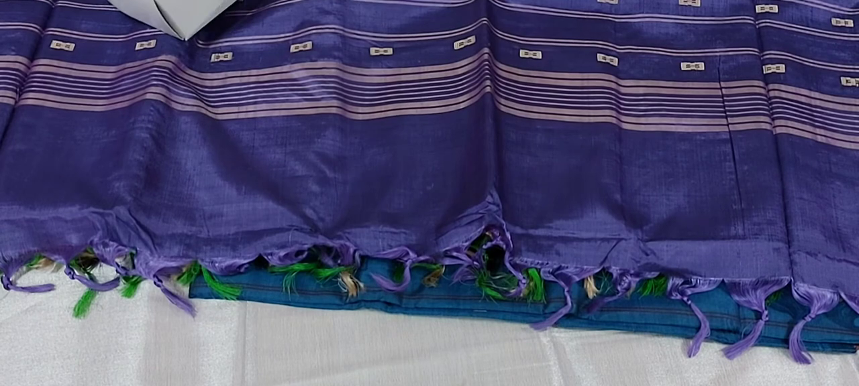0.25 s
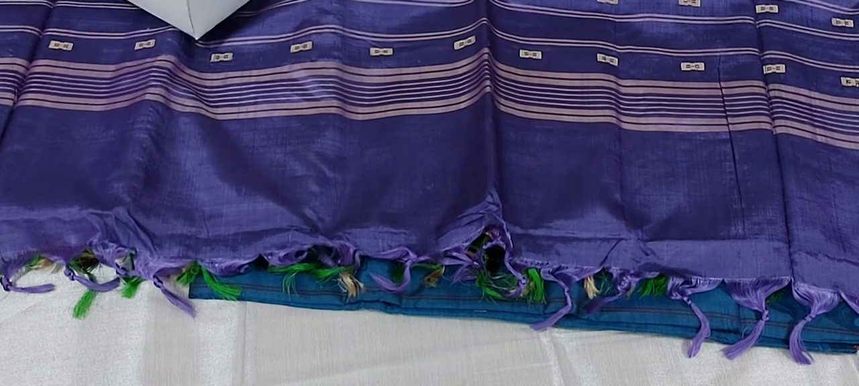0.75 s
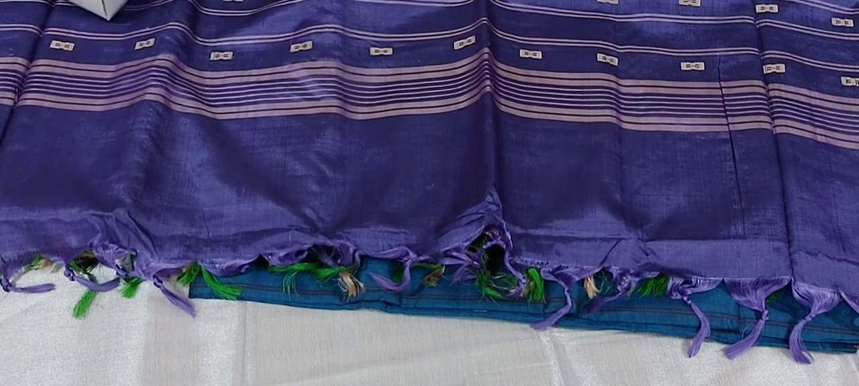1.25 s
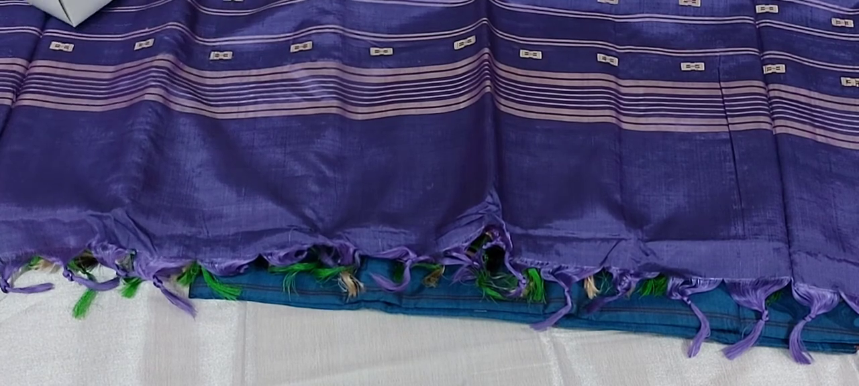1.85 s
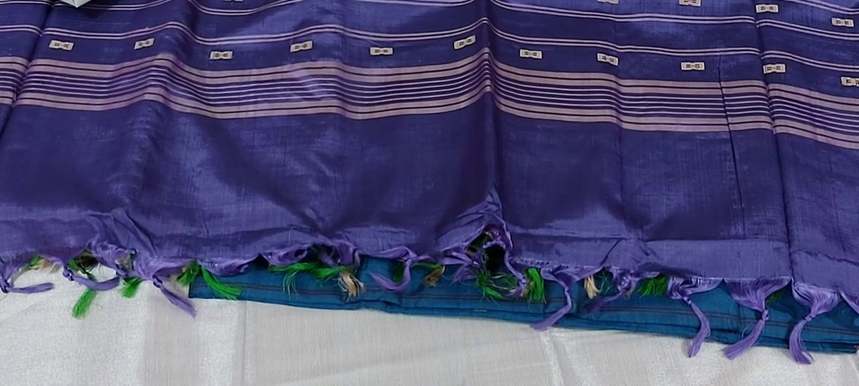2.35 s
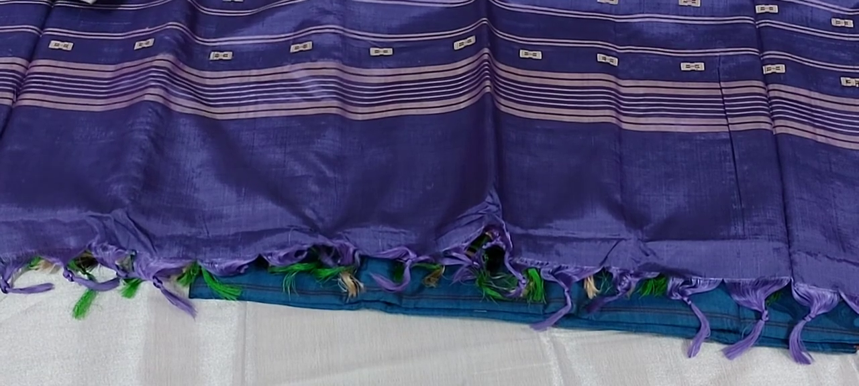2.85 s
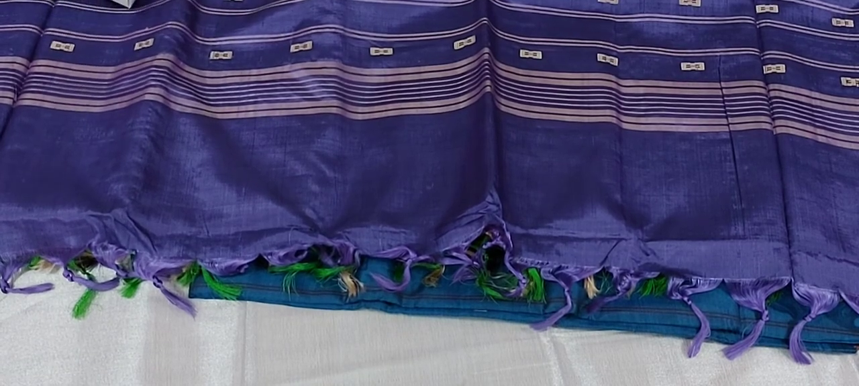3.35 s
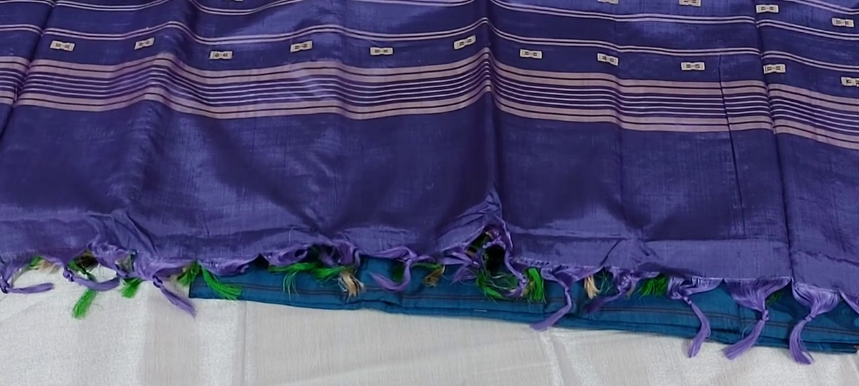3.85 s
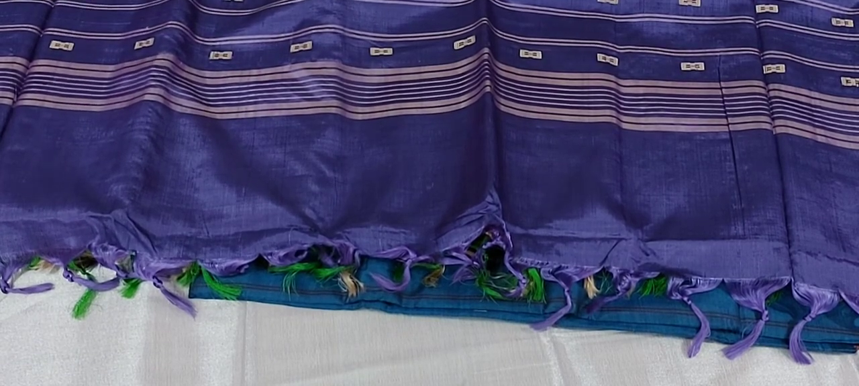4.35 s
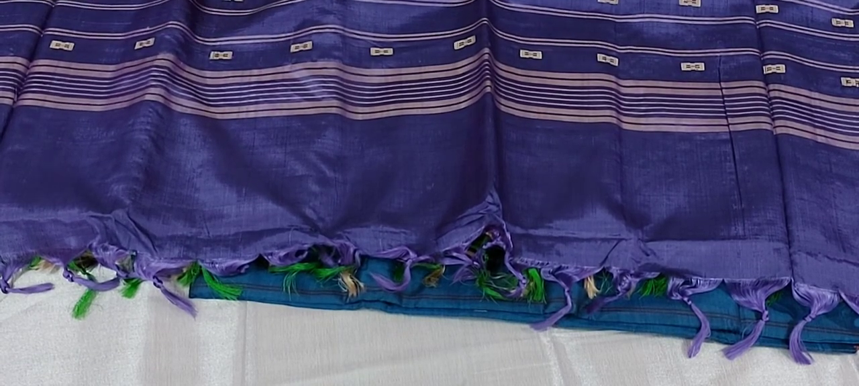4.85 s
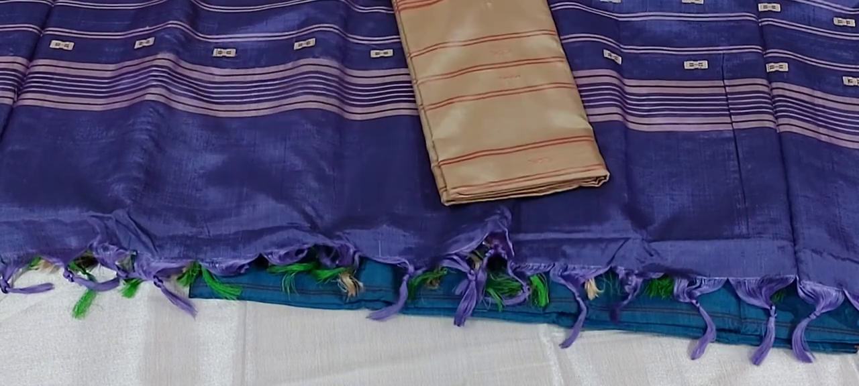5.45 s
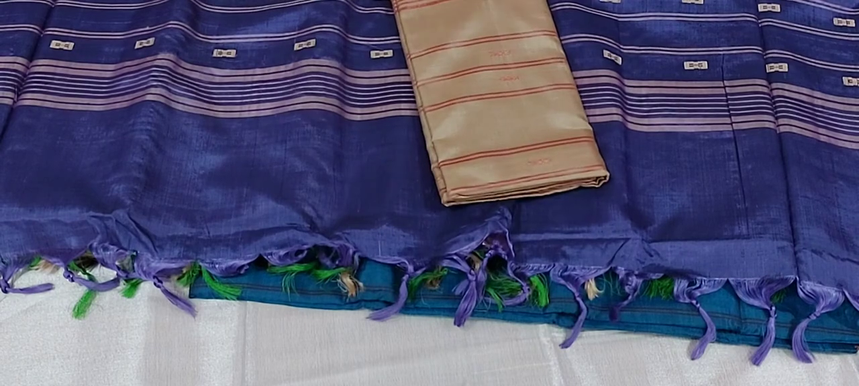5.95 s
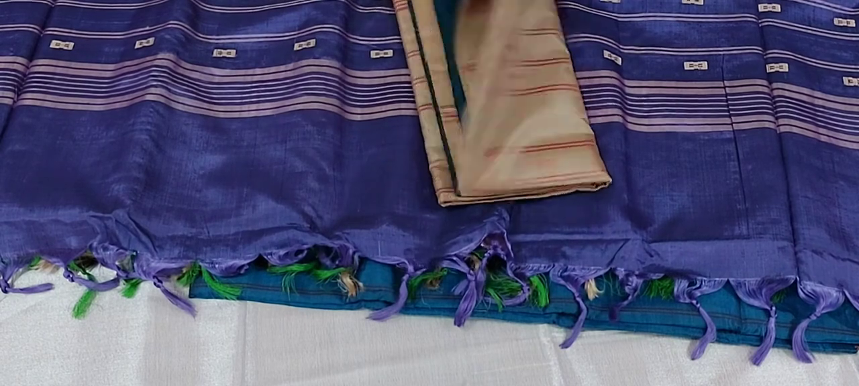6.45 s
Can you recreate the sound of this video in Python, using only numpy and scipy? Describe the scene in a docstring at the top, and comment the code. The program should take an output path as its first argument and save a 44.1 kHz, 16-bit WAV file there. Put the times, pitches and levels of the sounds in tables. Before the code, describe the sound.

Folded silk cloths slide, rustle and flop softly onto a covered table, with dull pats and light flicks in a small humming room.

```python
"""Silk cloths handled on a covered table

Folded silk cloths are slid off a pile, patted and flopped down, close to two microphones in a small room.
Each landing is a burst of soft contacts, shaped by the resonance of a pocket of trapped air.
Strokes, and the rustle and click of landing cloth, are dense snaps heard as hiss and sparser, duller fold snaps.
Brief low swings make air puffs and one short low knock; the room rings, hums and faintly whines."""
import sys
import numpy as np
from scipy import signal
from scipy.fft import rfft, irfft, next_fast_len
from scipy.io import wavfile
from scipy.ndimage import map_coordinates

SR = 44100
rng = np.random.default_rng(int(sys.argv[2]) if len(sys.argv) > 2 else 0)


def transcribe(signal):
    """Save signal, clipped to [-1, 1], as a 16-bit WAV file at the path in sys.argv[1]."""
    frames = np.atleast_2d(signal).T
    limited = np.clip(frames, -1, 1)
    pcm = np.round(limited * 32767).astype(np.int16)
    wavfile.write(sys.argv[1], SR, pcm)


N = 294780


def amp(db):
    """Logarithmic level: decibels to an amplitude gain."""
    return 10 ** (np.asarray(db) / 20)


def unit(x):
    """Normalisation by mean power: x scaled to rms 1."""
    return x / np.sqrt(np.mean(x ** 2) + 1e-20)


def along(points, hz):
    """Logarithmic pitch scale: (pitch_hz, value) points joined by straight lines over log frequency."""
    pitches, values = np.transpose(points)
    return np.interp(np.log(hz + 1), np.log(pitches), values)


def wobble(rate):
    """Slow random modulation: a smooth curve through random knots, rate of them a second."""
    knots = rng.standard_normal(int(N * rate / SR) + 4)
    return map_coordinates(knots, [np.arange(N) * rate / SR])


def filtered(x, response):
    """Linear filtering: the spectrum of x times a response of frequency."""
    size = x.shape[-1]
    padded = next_fast_len(size + 4096, real=True)
    hz = np.fft.rfftfreq(padded, 1 / SR)
    return irfft(rfft(x, padded) * response(hz), padded)[..., :size]


def causal(gain):
    """Minimum phase: the folded cepstrum gives this gain with no sound ahead of the blow."""
    cepstrum = irfft(np.log(np.maximum(gain, 1e-6)))
    half = len(cepstrum) // 2
    cepstrum[1:half] *= 2
    cepstrum[half + 1:] = 0
    return np.exp(rfft(cepstrum))


def bump(hz, centre_hz, width_hz):
    """Damped resonance: a Lorentzian of height 1 and full width width_hz at half height."""
    return 1 / (1 + (2 * (hz - centre_hz) / width_hz) ** 2)


def diffuse(size):
    """Diffuse field: noise lifted at the room's modes, its left-right coherence greatest in the bass."""
    # low modes of the room: pitch_hz, width_hz, lift_db
    modes = [(65.5, 8.7, 5), (109.3, 3.8, 9.5), (127.8, 8.5, 7), (262.5, 13.2, 9.5), (313.2, 20, 7),
             (385.3, 9.7, 8), (481, 4.5, 6.5), (592, 6.2, 6), (680, 25, 4), (868, 20, 3), (1062, 31, 3.5)]
    # left-right likeness of the field: pitch_hz, correlation
    likeness = [(40, 0.19), (130, 0.96), (280, 0.82), (500, 0.62), (1000, 0.043), (2000, 0.016),
                (15000, 0.014)]

    def mid_side(hz):
        lift = amp(sum(db * bump(hz, pitch, width) for pitch, width, db in modes))
        turn = np.arccos(np.clip(along(likeness, hz), -1, 1)) / 2
        return lift * np.array([np.cos(turn), np.sin(turn)])

    mid, side = filtered(rng.standard_normal((2, size)), mid_side)
    return np.array([mid + side, mid - side])


def coloured(x, spectrum):
    """Spectral shaping: x filtered by a (pitch_hz, gain_db) curve, at rms 1."""
    return unit(filtered(x, lambda hz: amp(along(spectrum, hz))))


def room(force, s, direct_db, count=6):
    """Room acoustics: contacts from time s on reach two microphones directly, by early echoes and as a tail."""
    # reverberation time: pitch_hz, t60_s
    reverberation = [(90, 0.34), (450, 0.31), (2200, 0.35), (12000, 0.28)]
    # the cloth moves from the left to the middle: time_s, lead_ms of the left microphone
    left_lead = [(0, 0.19), (4.3, 0.16), (5.2, 0.047), (6.6, 0.057)]
    size = len(force)
    index = np.arange(size)

    def late(ms):
        return np.interp(index - np.round(ms * SR / 1000), index, force, left=0)

    lead_ms = np.interp(s + index / SR, *np.transpose(left_lead))
    out = amp(direct_db) * np.array([force, late(lead_ms)])
    # early reflections off near walls
    for ms, strength in zip(rng.uniform(2, 24, count), rng.standard_normal(count)):
        out += 0.18 * strength * late(ms)
    noise = unit(diffuse(size))
    pitches, t60s = np.transpose(reverberation)
    # the tail holds for 18 ms, while the first echoes arrive, then decays
    fading = np.maximum(np.arange(SR // 2) / SR - .018, 0)
    for share, t60 in zip(np.eye(len(t60s)), t60s):
        decay = amp(-60 * fading / t60) ** 2
        # every contact feeds its energy to the tail
        energy = abs(signal.fftconvolve(force ** 2, decay / decay.sum())[:size])
        band_noise = filtered(noise, lambda hz: along(np.c_[pitches, share], hz))
        out += np.sqrt(energy) * band_noise
    return out


def grains(rate, size_db, size):
    """Shot noise: snaps of cloth at random moments, rate a second, their sizes spread by size_db."""
    chance = rng.random(size)
    sign, strength = np.sign(rng.standard_normal(size)), rng.standard_normal(size)
    return (chance < rate / SR) * sign * amp(size_db * np.clip(strength, -2, 2))


def add(track, s, sound):
    """Superposition: a sound mixed in from time s."""
    start = max(round(s * SR), 0)
    track[:, start:start + sound.shape[1]] += sound[:, :max(N - start, 0)]


def background():
    """Stationary noise: the room's low hum, one swell of narrow-band whine and the microphones' own hiss."""
    # spectrum of the hum: pitch_hz, gain_db
    hum_spectrum = [(20, -13), (65, -1), (130, -9.5), (180, -8.5), (280, -3), (380, -7), (550, -14),
                    (1000, -19), (1500, -28), (3000, -78), (16000, -25.5)]
    # spectrum of the hiss: pitch_hz, gain_db
    hiss_spectrum = [(100, 0), (2000, -15), (5500, -5), (6700, 8.5), (7700, 18), (8600, 2), (11500, 3.5),
                     (16000, -14)]
    whine_s, whine_db, whine_length_s = 2.53, -78, 0.35  # peak time, level before balance, Gaussian deviation
    hum = amp(-66.0 + 0.8 * wobble(1.76)) * coloured(diffuse(N), hum_spectrum)
    swell = np.exp(-.5 * ((np.arange(N) / SR - whine_s) / whine_length_s) ** 2)
    whine = amp(whine_db) * swell * unit(filtered(diffuse(N), lambda hz: bump(hz, 1390, 75)))
    hiss = amp(-74.0) * coloured(rng.standard_normal((2, N)), hiss_spectrum)
    balance = amp([[1], [-1]])
    return (hum + whine) * balance + hiss


def puffs_and_knock():
    """Low-frequency pressure pulses: each is a sine under a Gaussian, stronger on the left."""
    # low air puffs and one short low knock, at 4.035 s:
    # centre_s, level_db before the side gains, length_s to a fall by e, pitch_hz
    low_swings = [(0.013, -44, 0.032, 46.6), (0.484, -53, 0.039, 75), (0.957, -47.5, 0.025, 67.4),
                  (1.298, -52, .021, 50.4), (1.462, -42, 0.012, 55), (2.482, -48, 0.012, 50.7),
                  (3.866, -51, .009, 75), (3.921, -48.5, .013, 70), (4.035, -39, 0.0047, 82),
                  (4.057, -49, .016, 50), (5.234, -42, .02, 60), (6.19, -48, .031, 80.5),
                  (6.308, -54, 0.11, 71)]
    out = np.zeros((2, N))
    t = np.arange(N) / SR
    for (s, db, length, hz), (phase, skew) in zip(low_swings, rng.random((len(low_swings), 2))):
        near = abs(t - s) < 3 * length
        u = t[near] - s
        turns = hz * u + phase + np.array([[0], [0.5 * skew]])  # the sides differ by up to a quarter cycle * 2
        out[:, near] += amp(db) * np.exp(-(u / length) ** 2) * np.sin(2 * np.pi * turns)
    side_gains = amp([[2], [-6]])
    return out * side_gains


def cloth_gains():
    """Power addition: gains of silk, folds and sheen, as each movement swells, peaks and dies away."""
    # strokes of cloth over cloth, and the rustle and click of landing cloth:
    # peak_s, swell_s, fade_s, then silk_db, folds_db, sheen_db before flutter and balance
    movements = [(.03, 0.14, 0.036, -66, -66, -63), (.13, 0.022, .17, -73, -75, -74),
                 (.345, 0.074, 0.077, -55.5, -57, -74), (0.403, 0.072, 0.096, -57, -48, -80),
                 (.835, 0.061, 0.12, -63, -67, -65), (.9, 0.051, 0.095, -67, -56.5, -74),
                 (1.05, 0.064, 0.064, -68, -59.5, -72), (1.479, 0.067, .07, -54, -48.5, -78),
                 (1.555, 0.04, 0.094, -49.5, -67, -62), (1.75, 0.23, 0.094, -59, -56.5, -62.5),
                 (2.11, 0.18, 0.11, -72.5, -64.5, -87), (2.38, 0.1, 0.14, -72, -67, -70),
                 (2.75, 0.057, 0.077, -90, -72, -69), (3.15, 0.24, 0.22, -57.5, -65.5, -64),
                 (3.365, 0.12, 0.075, -52.5, -59, -61), (3.53, 0.07, 0.09, -73, -67, -80),
                 (3.79, 0.063, 0.067, -62, -59, -79), (4.035, .1, 0.11, -51, -62.5, -56.5),
                 (4.16, .03, 0.077, -61, -80, -62), (4.779, 0.11, 0.17, -72, -55, -76),
                 (5.14, 0.025, 0.062, -89, -71.5, -63.5), (5.215, .015, 0.055, -72, -44, -55.5),
                 (5.7, 0.17, 0.2, -69.5, -59.5, -70), (5.834, 0.06, 0.09, -59.5, -54, -76),
                 (6.06, 0.15, 0.16, -60, -54, -85), (6.18, 0.095, 0.052, -55.5, -47, -80),
                 (6.295, 0.032, 0.063, -65.5, -51.5, -82), (6.46, .12, 0.069, -79, -62, -77),
                 (6.58, 0.14, 0.097, -76, -92, -64.5)]
    # held cloth between movements: silk_db, folds_db, sheen_db on the same scale
    resting_db = [-86, -74.5, -77]
    drop_db, rounding = 11.5, 0.3  # fall per swell or fade time, far from the peak; rounding of the peak
    t = np.arange(N) / SR
    power = np.outer(amp(resting_db), np.ones(N)) ** 2
    for s, swell, fade, *levels_db in movements:
        away = (t - s) / np.where(t < s, swell, fade)
        shape = amp(-drop_db * (np.hypot(away, rounding) - rounding))
        power += np.outer(amp(levels_db), shape) ** 2
    return np.sqrt(power)


def rubbing_and_rustling():
    """Friction and buckling: threads make fine hiss and airy sheen, folds buckle in coarser, duller snaps."""
    # hiss of silk: pitch_hz, gain_db
    silk_spectrum = [(100, 3), (500, -13.5), (1200, 0), (2500, 2), (4200, 1), (6000, -3), (9000, -3.5),
                     (11800, -2.5), (16000, -8.5)]
    # crumpling folds: pitch_hz, gain_db
    folds_spectrum = [(25, -7), (70, -11), (130, 2), (190, 3), (300, 4), (550, 3.5), (1000, -1), (2000, -7),
                      (4000, -21.5), (15000, -43)]
    # airy top of the silk: pitch_hz, gain_db
    sheen_spectrum = [(3000, -12.5), (7000, 0.5), (9000, 1.5), (11500, 6.5), (14000, 5.5), (16000, 0)]
    silk_gain, folds_gain, sheen_gain = cloth_gains()
    threads = room(grains(rate=3000, size_db=5, size=N), 0, direct_db=-5)
    silk = silk_gain * amp(1.0 + 1.23 * wobble(30)) * coloured(threads, silk_spectrum)
    snaps = room(grains(rate=260, size_db=9.5, size=N), 0, direct_db=-9.5)
    folds = folds_gain * amp(0.17 * wobble(25)) * coloured(snaps, folds_spectrum)
    finest = room(grains(rate=11000, size_db=3.0, size=N), 0, direct_db=-8.5)
    sheen = sheen_gain * coloured(finest, sheen_spectrum)
    return silk + folds + sheen * amp([[.9], [-.7]])


def pat(s, spread, pocket_hz, direct_db, levels_db, bands_hz, size=16384):
    """Impact and cavity resonance: a flat fold strikes at once, a loose one settles; trapped air pops out."""
    # soft contact: pitch_hz, gain_db
    contact_spectrum = [(25, -35), (48, -9), (70, -3), (125, 0.5), (185, -3), (260, -1), (400, -1),
                        (520, -1), (1000, -2.5), (2100, -9), (3200, -16.5), (6000, -25), (9000, -27.5),
                        (11800, -28.5), (16000, -38)]
    t = np.arange(size) / SR
    settling = np.exp(-t / spread) * (1 - np.exp(-t / (.5 * spread)))
    force = grains(rate=2200, size_db=1.0, size=size) * settling
    force[0] += 1.1 + 8 * np.exp(-spread / 0.00086)  # the first strike, hardest in a compact blow

    def contact_and_pocket(hz):
        # the air pocket resonates and muffles what lies above its pitch
        ring_db = 6 * bump(hz, pocket_hz, 0.26 * pocket_hz)
        muffling_db = 5 / (1 + (1.3 * pocket_hz / (hz + 1)) ** 8)
        return causal(amp(along(contact_spectrum, hz) + ring_db - muffling_db))

    blow = filtered(room(force, s, direct_db), contact_and_pocket)
    # the first 40 ms set the gain that steers each band towards its own level
    head = blow[:, :SR // 25].mean(0)
    parts = []
    for band in zip(bands_hz, bands_hz[1:]):
        band_pass = signal.butter(4, band, 'band', fs=SR, output='sos')
        parts.append(signal.sosfilt(band_pass, head))
    gains_db = levels_db - 20 * np.log10(np.std(parts, axis=1) + 1e-12)
    centres = np.sqrt(np.multiply(bands_hz[:-1], bands_hz[1:]))
    return filtered(blow, lambda hz: causal(amp(along(np.c_[centres, gains_db], hz))))


def landings():
    """Spectral balance of impacts: weight adds thump, hardness slap and crispness; compact blows sound closer."""
    # cloth landings: start_s, level_db before balance, spread_s of the contacts,
    # pocket_hz of the trapped air, weight_db, hardness_db
    pats = [(.113, -56, 0.00054, 447, -17, -17), (.261, -51, 0.0047, 410, -6.5, -26),
            (.343, -47.5, 0.0059, 574, 6, -9.5), (0.794, -55, 0.0038, 264, 7.5, -26),
            (.813, -55.5, 0.016, 790, 0.5, 2.5), (1.309, -51.5, 0.0031, 646, 4, 0.5),
            (1.325, -50, 0.013, 300, -4, -8.5), (1.459, -47, 0.01, 940, 1, -7.5),
            (1.529, -38, 0.0015, 336, -3, -6), (1.565, -59.5, 0.00067, 1720, 11, 12),
            (1.767, -38, 0.0021, 543, -2.5, -11), (2.015, -47, 0.0026, 360, -5.5, -17.5),
            (3.306, -53, 0.01, 297, 1, -25), (4.66, -41.5, 0.0067, 505, -11.5, -12.5),
            (4.685, -50.5, 0.0081, 656, -12, -2.5), (4.768, -46, 0.0084, 420, -6, -7),
            (5.18, -44.5, 0.011, 970, -1, -12), (5.2118, -43, 0.0011, 234, 3, -8.5),
            (5.2183, -43, 0.00015, 1250, -1, 4.5), (6.025, -47.5, 0.018, 318, -8.5, -16.5),
            (6.106, -33, 0.0063, 526, -20, -7.5), (6.122, -39, 0.0078, 520, -17, -6.5),
            (6.143, -52.5, 0.0028, 1040, 7, 9.5), (6.236, -51, 0.013, 810, -1, -4.5)]
    # edges of thump, pop, slap and crispness: edge_hz
    band_edges_hz = [55, 190, 750, 3000, 15500]
    slap_db, crisp_db = -1.9, -9.5  # relative to the pop, in a middling landing
    crisp_follows = 0.62  # share of hardness that reaches the crispness
    # a larger fold is crisper: gain for each octave that its pocket lies under the usual pitch
    crisp_size_db, usual_pocket_hz = 1.5, 530
    # gain of the direct sound, and its loss for each doubling of the usual spread
    usual_direct_db, direct_loss_db, usual_spread_s = -7.5, 2.24, 0.0033
    out = np.zeros((2, N))
    for s, db, spread, pocket_hz, weight_db, hard_db in pats:
        spread = max(spread, 1e-4)
        direct_db = usual_direct_db - direct_loss_db * np.log2(spread / usual_spread_s)
        size_db = crisp_size_db * np.log2(usual_pocket_hz / pocket_hz)
        crispness_db = crisp_db + crisp_follows * hard_db + size_db
        levels_db = db + np.array([weight_db, 0, slap_db + hard_db, crispness_db])
        add(out, s, pat(s, spread, pocket_hz, direct_db, levels_db, band_edges_hz))
    return out


def scene():
    """Stereo level difference: the cloth sounds a little to the left, over the low swings and background."""
    balance = amp([[1.6], [-1.8]])
    return background() + puffs_and_knock() + (rubbing_and_rustling() + landings()) * balance


def record(dry):
    """Band limitation: an ideal low-pass keeps nothing above the limit."""
    top_hz = 15850
    return filtered(dry, lambda hz: hz < top_hz)


dry = scene()
out = record(dry)
transcribe(out)
```